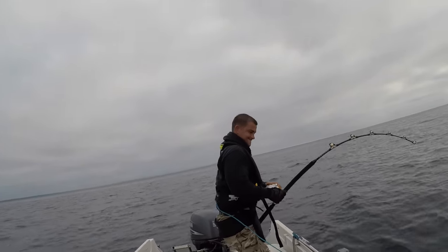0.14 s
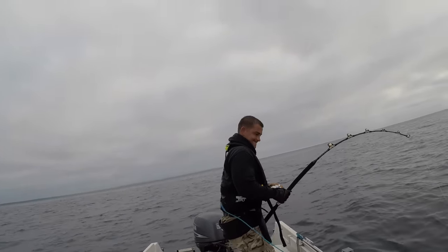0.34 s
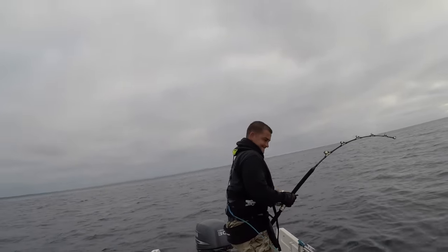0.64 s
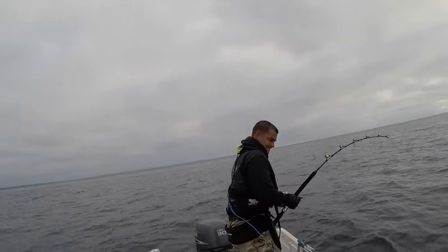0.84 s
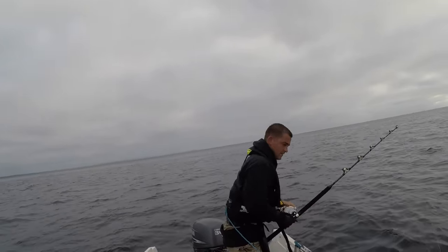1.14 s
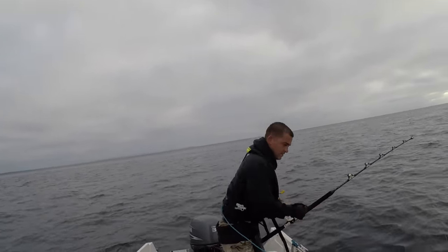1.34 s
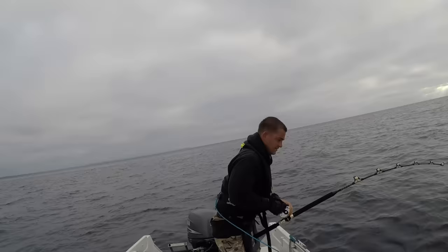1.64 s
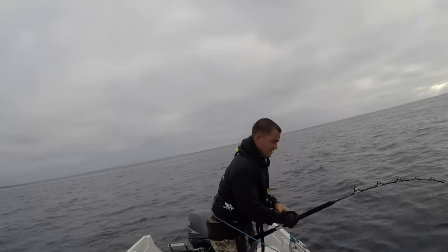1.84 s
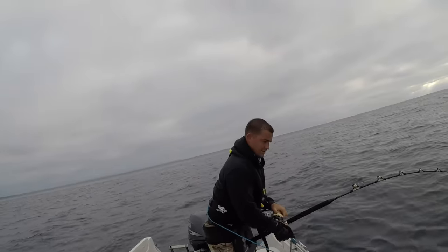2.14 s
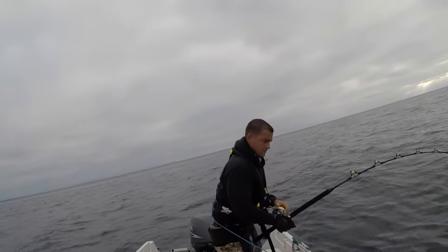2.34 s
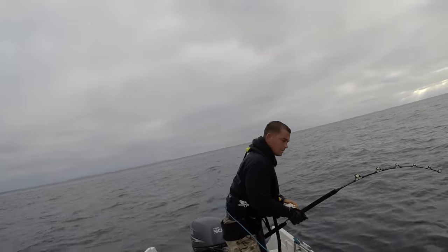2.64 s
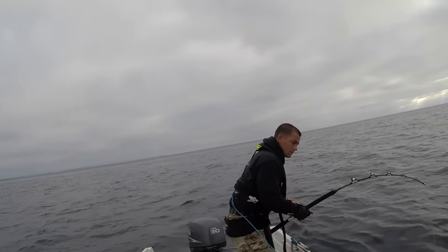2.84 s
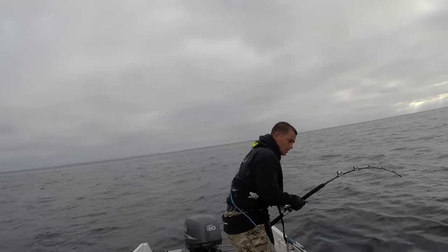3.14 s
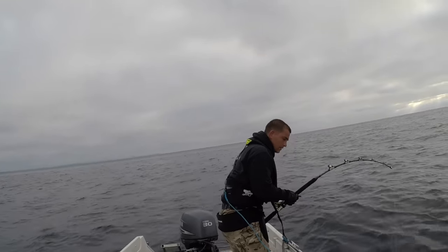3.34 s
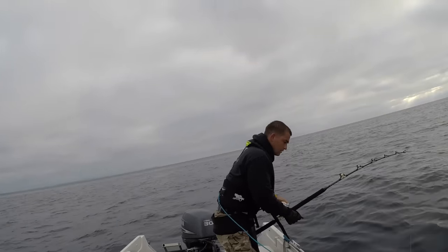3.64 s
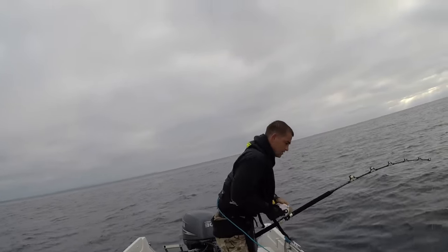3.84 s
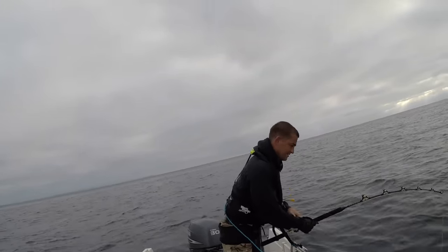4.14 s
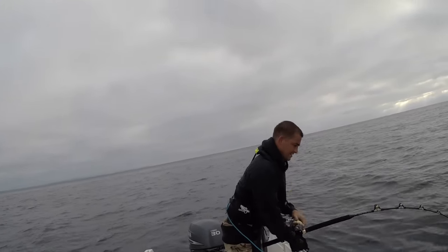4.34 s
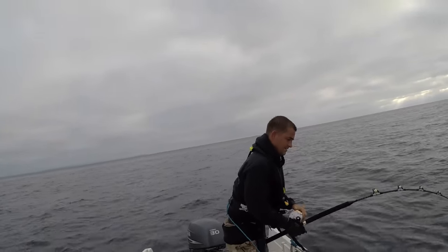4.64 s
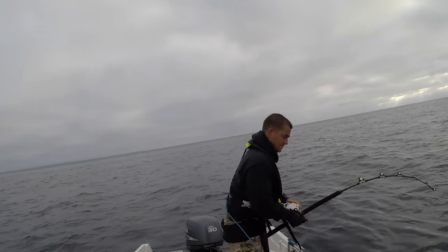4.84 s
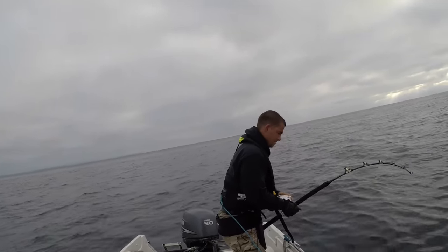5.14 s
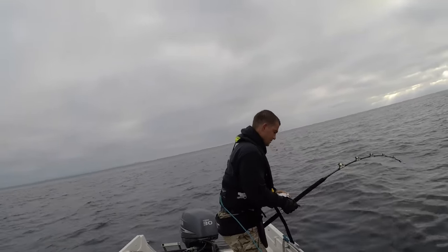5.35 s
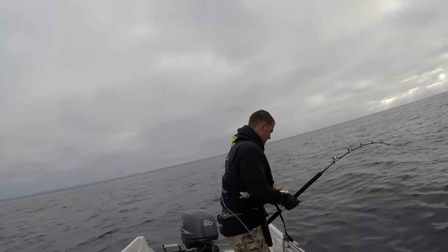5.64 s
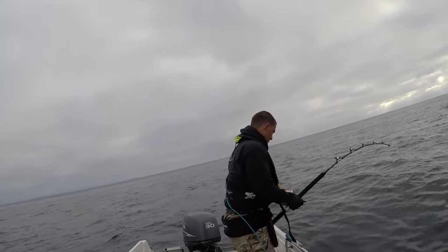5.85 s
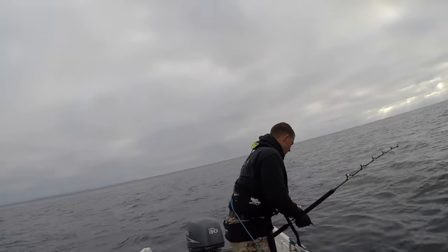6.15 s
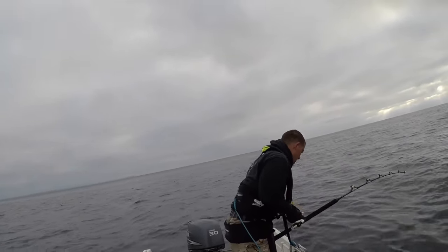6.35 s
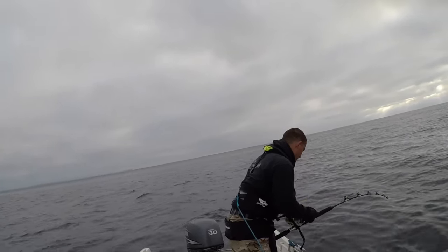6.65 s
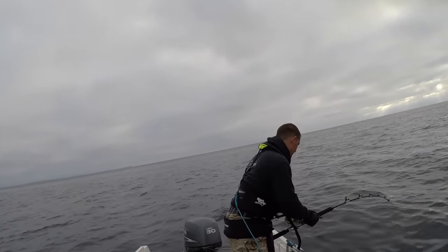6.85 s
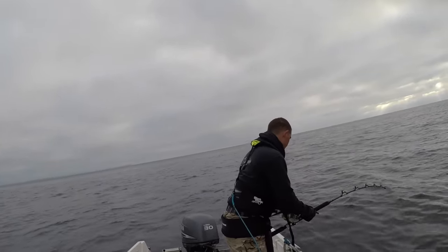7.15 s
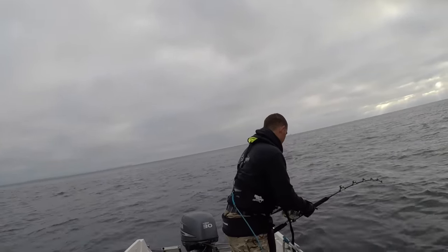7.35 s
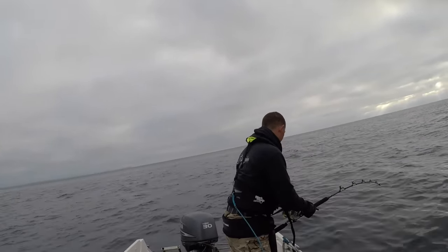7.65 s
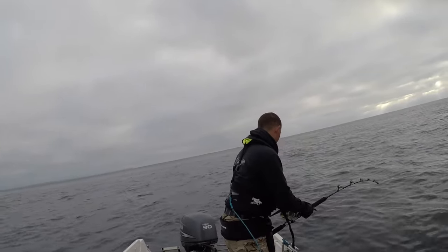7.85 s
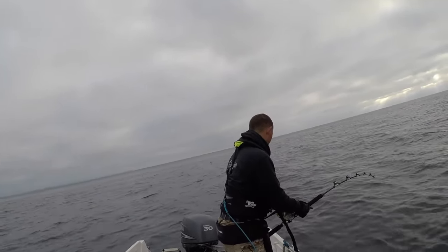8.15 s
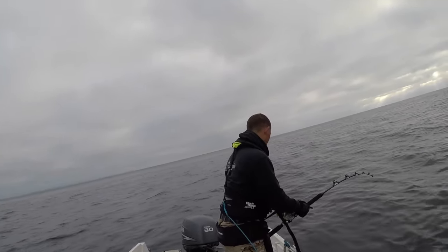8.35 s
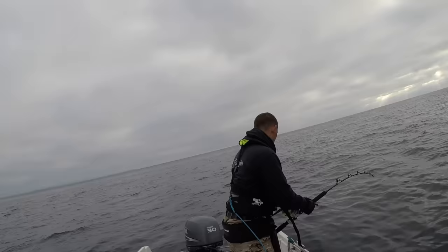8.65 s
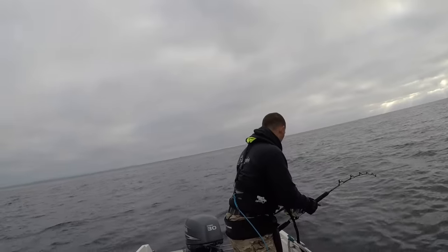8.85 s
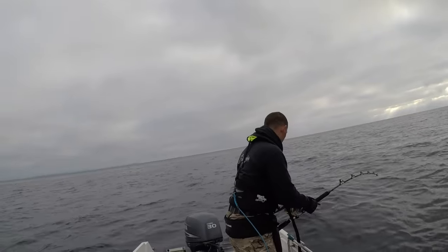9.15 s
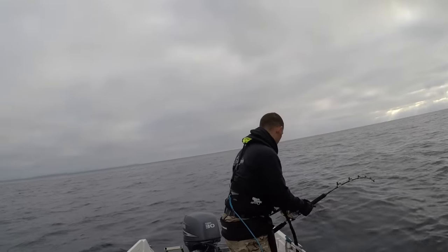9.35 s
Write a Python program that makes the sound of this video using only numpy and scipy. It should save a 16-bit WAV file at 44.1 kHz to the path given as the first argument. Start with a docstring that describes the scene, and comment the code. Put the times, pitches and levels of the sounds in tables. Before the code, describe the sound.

Loud, bright reel clicking races and slows in three main bursts, with low wind buffeting, motor putter and soft sea wash

```python
"""Wind buffets the microphone over an idling outboard: an angler plays a fish from a small boat at sea.
Line leaves the reel in bursts, ticking tooth by tooth and buzzing as the spool races; each tooth's
two pawl landings are shaped noise ringing steel, frame, spool and rod.
Tackle ticks, hull bumps and water slaps are bursts of noise through resonances; the motor is a stack of
wavering harmonics with whirr and valves; wind, sea wash and rustling jacket are shaped noise."""
import sys
import numpy as np
from scipy import signal
from scipy.fft import rfft, irfft
from scipy.io import wavfile
from scipy.ndimage import uniform_filter1d

SR = 44100
rng = np.random.default_rng(int(sys.argv[2]) if len(sys.argv) > 2 else 0)


def wav_out(sig):
    """Save sig, one row per channel (or a flat mono array), as 16-bit PCM at SR to the path in sys.argv[1]."""
    wavfile.write(sys.argv[1], SR, np.round(np.clip(np.atleast_2d(sig).T, -1, 1) * 32767).astype(np.int16))


N = 419371
TIME = np.arange(N) / SR
BODY_BINS_HZ = np.fft.rfftfreq(4096, 1 / SR)

# Tugs of the fish on the line, one list per tug.
# Each row: time in seconds, spool speed in teeth per second, pull on the pawl in dB.
TUGS = [
    [(1.0864, 52.3, 6.5), (1.115, 115, 2.5), (1.14, 149.2, 1.5), (1.2, 156.7, -0.5), (1.24, 153.7, 0.7),
     (1.3, 138.7, 0), (1.345, 124.3, -0.8), (1.385, 86.8, -3.5), (1.42, 98.8, -3), (1.455, 126.2, -3),
     (1.5, 114.8, 0.3), (1.545, 97.2, 1.7), (1.578, 64.3, -1), (1.61, 125.4, 0.3), (1.68, 108.4, 1.2),
     (1.735, 87.3, -0.8), (1.768, 38.6, -1), (1.815, 21.8, 4)],
    [(1.8446, 43.9, -3.5), (1.88, 108.7, -0.5), (1.912, 110.9, 1.5), (1.94, 65.7, 1.1), (1.965, 21.4, -10),
     (1.998, 67.9, -13)],
    [(2.036, 45.7, -14.5), (2.07, 40.5, 8.4), (2.104, 57.8, 3.0), (2.14, 54.4, 0.5)],
    [(3.6516, 51.0, -20.6), (3.674, 51.1, -3)],
    [(3.7098, 62.9, 4), (3.745, 154.6, 1.5), (3.78, 126.5, 2.4), (3.81, 109.9, 1.8), (3.865, 113.2, 3),
     (3.9, 130.3, 1.3), (3.935, 148.7, -0.1), (3.968, 107.6, 0), (3.99, 41, -2.7), (4.01, 28.4, 0.6)],
    [(4.0429, 34.1, 1.2), (4.09, 34.1, -1.5), (4.137, 83.4, -1.2), (4.217, 77.0, 1.0), (4.358, 104.3, 2.1),
     (4.396, 30.5, 2.2)],
    [(6.2037, 26.6, 7.9), (6.22, 46.7, 3), (6.245, 84.9, 3), (6.275, 112.7, 4.3), (6.325, 132.2, 2.3),
     (6.36, 104.3, -0.3), (6.385, 73, -2), (6.412, 38.3, -2.5)],
    [(6.431, 45.8, 0.1), (6.47, 45.9, 1.1), (6.516, 66.0, -1.2), (6.573, 29.7, 6.3)],
    [(6.6037, 31.7, 5.6), (6.64, 53.0, 3.2), (6.699, 69.1, 1.4), (6.765, 19.8, 12.1)],
    [(7.3289, 40, 3.5), (7.34, 40, 3.5)],
]
# How the pawl seats in each tug. Each row: shift of its main note in Hz, shift of its upper resonances
# in Hz, change of its highest resonance in dB, whine of the spool in dB against the rod.
PAWL_SEATING = [(0, -190, 1, -17), (0, -5, 1, -24), (80, 0, -2, -19), (0, -5, -1, -22), (30, -100, 0, -23),
                (0, 193, 4, -10), (170, 77, -2, -11.5), (150, 0, 1, -17), (0, 3, 2, -7), (0, -200, -8, -22)]
# How the pawl lands. Each row: spool speed in teeth per second, contact in seconds, chatter in dB,
# rebound delay in seconds (before scatter), rebound in dB (before the extra rebound and scatter).
PAWL_LANDING = [(60, .0022, -5, .0056, -8), (85, .0018, -4.5, .0053, -4), (115, .0014, -5.5, .0043, -2.5),
                (132, .0015, -4.5, .0038, -2.5), (150, .0015, -4, .0028, -5)]
# How strikes shake the tackle as the load shifts. Each row: time in seconds, frame in dB, change of the
# frame's sharpest ring in dB, rod in dB, grip in dB, extra rebound of the pawl in dB.
LOAD_SHAKE = [(1.1, -10, -4, -13, -19, 7), (1.22, -10.5, -4, -13.5, -21, -6),
              (1.35, -14, 1, -16.5, -21.5, 3.5), (1.5, -10.5, 5, -10.5, -22.5, -0.5),
              (1.68, -10.5, -10, -17, -22, 7), (1.9, -9, 2, -11.5, -22.5, 0), (2.1, -12.5, -3, -15, -26, 2),
              (3.73, -7, 3, -11, -18, 6.5), (3.8, -11, -1, -12, -20, 0), (3.96, -10, -3, -14.5, -21, 8),
              (4.15, -6, 4, -9.5, -19.5, 0.5), (4.35, -12, 2, -14.5, -19, -1),
              (6.25, -8.5, 2, -11.5, -20, 6.5), (6.35, -10.5, 5.5, -14, -21, 4.5),
              (6.5, -5.5, 3.5, -14, -19, 1.5), (6.7, -6.5, 1, -17.5, -19.5, 0.5),
              (7.33, -14, -4, -14.5, -22, -1)]
# Upper resonances of the steel pawl, before seating and scatter.
# Each row: centre in Hz, width in Hz, level in dB against the main note.
PAWL_UPPER_MODES = [(7590, 210, -10), (9900, 1700, -14.5), (10890, 600, -7), (13820, 380, -13)]
# The reel's frame, before load and scatter. Each row: centre in Hz, width in Hz, relative level in dB.
FRAME_MODES = [(3240, 590, -7.5), (3800, 310, 1), (4100, 90, -11), (4770, 410, 1.5), (5420, 550, -1),
               (5920, 590, -0.5), (6750, 320, -2.5)]
# The rod. Each row: centre in Hz, width in Hz, relative level in dB.
ROD_MODES = [(858, 40, -0.5), (940, 38, 2.5), (1020, 40, -3.5), (1115, 30, -4), (1410, 200, -8.5),
             (1880, 400, -11.5)]
# The rod's deeper grip. Each row: centre in Hz, width in Hz, relative level in dB.
GRIP_MODES = [(410, 95, -6.5), (557, 25, -1), (614, 23.5, 2.5), (723, 24.5, -2)]
# Thin note of the spool's flange. Each row: centre in Hz, width in Hz, relative level in dB.
FLANGE_MODES = [(2187, 53, -6)]
# Main note of the pawl: it sags within a tug and scatters (as a fraction), less on a fast spool.
PAWL_HZ, SAG_HZ_PER_S, NOTE_SCATTER = 8334, 260, 0.032
# A tooth strikes hard on a running spool; below the creeping speed it eases the pawl down.
TOOTH_DB, CREEP_TEETH_PER_S, CREEP_DB_PER_OCTAVE = 11, 64.3, 11.5

# The rod butt snaps in its holder. Each row: start in seconds, peak level in dB.
BUTT_SNAPS = [(0.243, -3.5)]
# The butt in its holder. Each row: centre in Hz, width in Hz, relative level in dB.
BUTT_MODES = [(1190, 740, -17.5), (4160, 590, -3), (5040, 650, -5.5), (6740, 550, -1), (7800, 450, 2),
              (10500, 1300, -12), (13400, 1300, -14)]
# Sharper ticks of tackle; the row at 1.052 s is instead a dull knock ringing on just after the first hull bump.
# Each row: start in seconds, peak level in dB, centre in Hz.
TACKLE_TICKS = [(0.614, -27, 7300), (1.052, -20, 1100), (1.809, -21.5, 5000), (2.554, -31, 4550),
                (2.848, -28, 9000), (2.969, -23.5, 6200), (3.066, -24, 7360), (3.157, -30, 3900),
                (4.568, -26, 4240), (4.886, -26, 4750), (4.934, -29, 3440), (5.515, -31, 4350),
                (5.582, -32, 9000), (5.995, -34, 7100), (6.875, -36, 4620), (7.712, -32, 7150),
                (7.734, -27.5, 6978), (7.845, -26, 3800), (8.169, -32, 4370), (8.353, -27.5, 3840),
                (8.656, -30, 7240), (8.748, -31, 6800), (8.872, -37, 7000)]
# Fainter ticks fall at random: loudest peak, spread below it, range of centres.
STRAY_TICK_DB, STRAY_SPREAD_DB, STRAY_LOW_HZ, STRAY_HIGH_HZ = -31, 6, 3800, 9000

# Hollow bumps on the hull. Each row: start in seconds, peak level in dB.
HULL_BUMPS = [(1.049, -9.5), (1.793, -20), (3.568, -14), (7.832, -20.5)]
# The hull. Each row: centre in Hz, width in Hz, relative level in dB.
HULL_MODES = [(149.7, 25.4, 3.5), (330, 100, -14), (955, 590, -29.5)]
# Water slaps on the hull. Each row: start in seconds, peak level in dB, centre in Hz, width in Hz.
WATER_SLAPS = [(4.326, -22, 610, 50), (4.568, -27, 1520, 90), (7.189, -27.5, 770, 110),
               (7.86, -30, 860, 220), (8.41, -37, 1040, 130), (8.789, -30, 820, 110),
               (8.951, -30.5, 1260, 130), (9.045, -30.5, 657, 50), (9.16, -33, 694, 90)]
# A slap's push fades over a fixed number of cycles; softer laps fall at random.
BUMP_DECAY_S, SLAP_CYCLES = 0.02, 18
LAP_DB, LAP_SPREAD_DB, LAP_LOW_HZ, LAP_HIGH_HZ = -37, 5, 550, 1600

# Idling outboard, its pace. Each row: time in seconds, firings per second.
IDLE_PACE = [(0, 21.83), (2.2, 21.82), (2.7, 21.69), (4.4, 21.68), (5.2, 21.47), (6.9, 21.42), (7.6, 21.66),
             (9.51, 21.74)]
# Level of its exhaust thud. Each row: time in seconds, level in dB.
IDLE_LEVEL = [(0, -24.5), (1.5, -33), (2.9, -22.5), (4.1, -28), (7, -26.5), (8.1, -30.5), (8.75, -24),
              (9.5, -28)]
# Its exhaust note. Each row: multiple of the firing rate, relative level in dB.
EXHAUST_ORDERS = [(2, 4), (3, 4), (4, -1), (5, -2), (6, 1), (7, -2.5), (8, 2), (9, -3.5), (11, -14.5),
                  (12, -14.5), (13, -14), (16, -26.5), (17, -21.5), (18, -23.5)]
# The cowling. Each row: centre in Hz, width in Hz, relative level in dB.
COWL_MODES = [(648, 27, 7), (727, 25, 7), (985, 16, 7), (1187, 26, 5), (1641, 30, 6), (2567, 15, 1),
              (3250, 54, 3), (3483, 55, 4), (3840, 200, -2), (4400, 100, -1.5), (4670, 76, -3)]

# Slow buffeting at the microphone. Each row: frequency in Hz, relative density in dB per Hz.
BUFFET_SPECTRUM = [(1, -7), (5, 2.5), (12, 1), (20, -3), (28, -10.5), (45, -35), (90, -78.5)]
# Gusts at the microphone. Each row: frequency in Hz, relative density in dB per Hz.
GUST_SPECTRUM = [(12, -5.5), (26, -1.5), (40, 0), (60, -14.5), (90, -21.5), (150, -33), (400, -44),
                 (1500, -104)]
# When the gusts strike. Each row: start in seconds, length in seconds, level in dB before the gust lift.
GUSTS = [(0.297, 0.4, -17.5), (0.87, 0.52, -16.5), (2.694, 0.043, -18.5), (3.997, 0.4, -20),
         (4.496, 0.059, -22), (4.721, 0.29, -17), (5.33, 0.047, -16.5), (6.956, 0.4, -20),
         (8.342, 0.034, -13)]
# Between them the breeze (also before the lift) and the slow buffeting go on.
BREEZE_DB, BUFFET_DB, GUST_RISE_S, GUST_FALL_S = -25.5, -9.5, 0.0096, 0.013

# Sea wash with the whirr of the outboard. Each row: frequency in Hz, relative density in dB per Hz.
WASH_SPECTRUM = [(60, 3), (170, 5), (270, 1), (380, -7.5), (520, -8), (750, -12.5), (1200, -13.5),
                 (2000, -19), (2700, -22.5), (4500, -27.5), (5600, -35), (8000, -54), (12000, -75),
                 (15000, -68)]
# Rustle of jacket and line. Each row: frequency in Hz, relative density in dB per Hz.
RUSTLE_SPECTRUM = [(2000, 8), (5500, -0.5), (6700, 3.5), (8200, 2), (9500, -3.5), (11000, -2), (13000, -6),
                   (15000, -55)]
# The angler shifts and the jacket rustles. Each row: start in seconds, length in seconds, level in dB.
RUSTLES = [(0.92, 0.082, -44), (2.8, 0.31, -48.5), (3.56, 0.16, -48.5), (4.55, 0.43, -51.5),
           (8.7, 0.45, -56)]
# Between them it flutters faintly.
FLUTTER_DB, RUSTLE_RISE_S, RUSTLE_FALL_S = -52.5, 0.04, 0.13

EDGE_HZ = 15350  # upper limit of the recorded band


def reel(note_width_hz=350, vary_db=2.0, frame_vary_db=3.0, push=0.4, rebound_note=0.99):
    """Each tooth flicks the steel pawl, which lands twice, rings and shakes the frame, spool and rod."""
    t = np.arange(2048) / SR
    metal, spool, rod, grip = np.zeros((4, N))
    scrapes = rng.standard_normal((2, len(t)))  # one for each landing
    alike, note_jitter = .9, .016
    share = np.clip(push, 0, 1)
    load_s, *load_columns = np.transpose(LOAD_SHAKE)
    for tug, (note_shift_hz, shift_hz, top_db, whine_db) in zip(TUGS, PAWL_SEATING):
        upper = np.array(PAWL_UPPER_MODES, float)
        upper[:, 0] += shift_hz
        upper[-1, 2] += top_db
        for s, strength_db, hz, per_s in tug_teeth(tug):
            load = [np.interp(s, load_s, column) for column in load_columns]
            frame_db, ring_db, rod_db, grip_db, rebound_db = load
            shell = np.array(FRAME_MODES, float)
            shell[1, 2] += ring_db
            frame = body(scattered(shell, frame_vary_db))
            # each tooth scrapes much like the one before, so the colour drifts as the spool turns
            fresh = rng.standard_normal(scrapes.shape)
            scrapes = alike * scrapes + np.sqrt(1 - alike ** 2) * fresh
            envelope, landings = flick(t, per_s, rebound_db)
            for (delay_s, force), scrape, note in zip(landings, scrapes, (1, rebound_note)):
                landing_s = s + delay_s
                strike = force * gain_of(strength_db)
                note_hz = (hz + note_shift_hz) * note * (1 + note_jitter * rng.standard_normal())
                pawl = body([(note_hz, note_width_hz, 0)] + scattered(upper, vary_db))
                for response, share_db in ((pawl, 0), (frame, frame_db)):
                    ring = signal.fftconvolve(scrape * envelope, response[:len(t)])
                    add(metal, landing_s, strike * gain_of(share_db) * ring / np.linalg.norm(ring))
                # the rod feels one clean push from each landing, and some of the chatter
                chatter = rng.standard_normal(len(t)) * envelope
                knock = strike * (share * (t == 0) + np.sqrt(1 - share ** 2) * chatter)
                for part, part_db in ((rod, rod_db), (grip, grip_db), (spool, rod_db + whine_db)):
                    add(part, landing_s, knock * gain_of(part_db))
    return metal + through(rod, ROD_MODES) + through(grip, GRIP_MODES) + through(spool, FLANGE_MODES)


def tug_teeth(tug):
    """One strike for each tooth passing the pawl: rows (s, strength dB, pawl Hz, teeth per second)."""
    jitter_s, uneven_db = .0002, 1.3
    t = np.arange(tug[0][0], tug[-1][0], 1 / SR)
    teeth_passed = np.cumsum(curve(tug, t)) / SR
    tooth = np.arange(int(teeth_passed[-1]) + 1)
    late, force, note = rng.standard_normal((256, 3))[tooth].T
    s = np.interp(tooth, teeth_passed, t)
    per_s = curve(tug, s)
    eased_db = CREEP_DB_PER_OCTAVE * np.maximum(np.log2(CREEP_TEETH_PER_S / per_s), 0)
    db = TOOTH_DB + curve(tug, s, axis=2) - eased_db + uneven_db * force
    sagged_hz = PAWL_HZ - SAG_HZ_PER_S * (s - s[0])
    hz = sagged_hz * (1 + NOTE_SCATTER * note * np.minimum(CREEP_TEETH_PER_S / per_s, 1))
    return np.transpose([s + jitter_s * late, db, hz, per_s])


def flick(t, per_s, extra_db):
    """Landing envelope, and a tooth's two landings as (delay s, force), both set by the spool's speed."""
    speeds, *columns = np.transpose(PAWL_LANDING)
    contact_s, chatter_db, rebound_s, rebound_db = (np.interp(per_s, speeds, c) for c in columns)
    envelope = blow(t, contact_s, chatter_db, chatter_s=.0048, deck_db=-18.5, deck_s=.02)
    again = gain_of(rebound_db + extra_db + 2 * rng.standard_normal())
    delay_s = rebound_s * rng.uniform(.92, 1.08)
    total = np.hypot(1, again)  # the two landings share one energy
    return envelope, [(0, 1 / total), (delay_s, again / total)]


def scattered(modes, spread_db):
    """Resonances with their levels scattered at random."""
    return [(hz, width, db + spread_db * rng.standard_normal()) for hz, width, db in modes]


def tackle():
    """Short noisy contacts ring the rod butt as a snap and small tackle as dry ticks."""
    t, out, tick_width = np.arange(4096) / SR, np.zeros(N), .28  # width as a fraction of the centre
    shape = blow(t, contact_s=.0018, chatter_db=-7, chatter_s=.004, deck_db=-24, deck_s=.022)
    faint = strays(STRAY_TICK_DB, STRAY_SPREAD_DB, STRAY_LOW_HZ, STRAY_HIGH_HZ, count=50)
    hits = [(s, db, BUTT_MODES) for s, db in BUTT_SNAPS]
    hits += [(s, db, [(hz, hz * tick_width, 0)]) for s, db, hz in TACKLE_TICKS + faint]
    for s, db, modes in hits:
        tick = signal.fftconvolve(shape * rng.standard_normal(len(t)), body(modes))
        add(out, s, gain_of(db) * tick / abs(tick).max())
    return out


def hull(lap_width=0.044):
    """Boots bump the hollow hull; short pushes of water ring pockets along its side."""
    t, out = np.arange(SR // 4) / SR, np.zeros(N)
    laps = strays(LAP_DB, LAP_SPREAD_DB, LAP_LOW_HZ, LAP_HIGH_HZ, count=12)
    water = WATER_SLAPS + [(s, db, hz, hz * lap_width) for s, db, hz in laps]
    pushes = [(s, db, BUMP_DECAY_S, HULL_MODES) for s, db in HULL_BUMPS]
    pushes += [(s, db, SLAP_CYCLES / hz, [(hz, width_hz, 0)]) for s, db, hz, width_hz in water]
    for s, db, decay_s, modes in pushes:
        burst = np.exp(-t / decay_s) * rng.standard_normal(len(t))
        slap = signal.fftconvolve(burst, body(modes))
        add(out, s, gain_of(db) * slap / abs(slap).max())
    return out


def outboard(lag_s_per_hz=.0003, waver=0.41, valve_hz=4650):
    """Firings thud through the exhaust, higher notes arriving later; cowling and valves sound in step."""
    firing_hz = curve(IDLE_PACE)
    firings, thud = np.cumsum(firing_hz) / SR, np.zeros(N)
    for order, db in EXHAUST_ORDERS:
        multiple = round(order)
        lag_cycles = lag_s_per_hz * (multiple * firing_hz.mean()) ** 2 / 2
        note = np.cos(2 * np.pi * (multiple * firings - lag_cycles))
        thud += gain_of(db) * (1 + waver * drift(9)) * note
    pulse = 1 + 0.39 * np.cos(2 * np.pi * firings)
    whirr = through(rng.standard_normal(N), COWL_MODES) * pulse
    # each tap starts with a firing and fades over a fraction of its cycle
    taps = rng.standard_normal(N) * np.exp(-(firings % 1) / .12) * gain_of(3 * drift(21))
    valves = evened(through(taps, [(valve_hz, 380, 0)]))
    return gain_of(curve(IDLE_LEVEL)) * evened(thud) + gain_of(-51.0) * whirr + gain_of(-60) * valves


def wind(gust_db=4.0):
    """Slow pressure swings and quicker gusts at the microphone, their crests rounded off."""
    buffet = steadied(noise(BUFFET_SPECTRUM)) * gain_of(BUFFET_DB)
    gust_gain = gain_of(gust_db) * swells(GUSTS, BREEZE_DB, GUST_RISE_S, GUST_FALL_S)
    gusts = steadied(noise(GUST_SPECTRUM)) * gust_gain
    fade_in = np.minimum(TIME / .02, 1)
    return .72 * np.tanh(fade_in * (buffet + gusts) / .72)


def steadied(x):
    """Evens out the strength of a noise over a sliding 6000 samples."""
    return x / np.sqrt(abs(uniform_filter1d(x ** 2, size=6000)) + .1)


def sea(drops_per_s=45, drops_db=-57):
    """A soft noise wash, with droplets and bubbles along the hull as decaying sines at random moments."""
    t, drops = np.arange(1024) / SR, np.zeros(N)
    pitches_hz = np.geomspace(700, 9000, num=24)
    for hz in pitches_hz:
        size = gain_of(4.5 * np.minimum(rng.exponential(1, N), 3))
        bursts = size * (rng.random(N) < drops_per_s / len(pitches_hz) / SR)
        ping = np.sin(2 * np.pi * hz * t) * np.exp(-hz * t / 7)
        drops += signal.oaconvolve(bursts, ping)[:N]
    swell_db = .8 * drift(6)
    return noise(WASH_SPECTRUM) * gain_of(-37.5 + swell_db) + gain_of(drops_db) * evened(drops)


def clothes():
    """Jacket and line rustle in fine grains: noise whose level wanders quickly."""
    grain_db = 2 * drift(400) + 1.2 * drift(40)
    shifting = swells(RUSTLES, FLUTTER_DB, RUSTLE_RISE_S, RUSTLE_FALL_S)
    return noise(RUSTLE_SPECTRUM) * gain_of(grain_db) * shifting


def body(modes):
    """Causal (minimum-phase) response, of energy one, of a body with the given resonances."""
    power = sum((gain_of(db) / (1 + ((BODY_BINS_HZ - hz) / width) ** 2)) ** 2 for hz, width, db in modes)
    log_gain = np.log(np.r_[power, power[-2:0:-1]] + 1e-10) / 2
    ring = np.fft.ifft(np.exp(np.conj(signal.hilbert(log_gain)))).real
    return ring / np.linalg.norm(ring)


def through(x, modes):
    """Lets a drive ring a body."""
    return signal.oaconvolve(x, body(modes))[:N]


def blow(t, contact_s, chatter_db, chatter_s, deck_db, deck_s):
    """Envelope, of energy one, of a hard contact, its weaker chatter and scatter from the deck."""
    contact = np.exp(-(t / contact_s) ** 2)
    chatter = (gain_of(chatter_db) * np.exp(-t / chatter_s)) ** 2
    deck = (gain_of(deck_db) * np.exp(-t / deck_s)) ** 2
    power = contact + chatter + deck
    return np.sqrt(power / power.sum())


def strays(top_db, spread_db, low_hz, high_hz, count):
    """Small events at random moments: rows (s, peak dB, centre Hz)."""
    return [(when * N / SR, top_db - spread_db * weak, low_hz * (high_hz / low_hz) ** high)
            for when, weak, high in rng.random((count, 3))]


def swells(rows, rest_db, rise_s, fall_s):
    """Gain that rises, holds and falls for each row (s, length s, dB), above a resting level."""
    power = gain_of(rest_db) ** 2
    for s, length_s, db in rows:
        before = np.maximum(s - TIME, 0) / rise_s
        after = np.maximum(TIME - s - length_s, 0) / fall_s
        power = power + gain_of(db) ** 2 * np.exp(-(before + after) ** 2)
    return np.sqrt(power)


def noise(spectrum):
    """Noise of rms one with the given spectrum."""
    hz, db = np.transpose(spectrum)
    bins_hz = np.fft.rfftfreq(N, 1 / SR)
    shape = gain_of(np.interp(np.log(bins_hz + 1), np.log(hz + 1), db))
    return evened(irfft(rfft(rng.standard_normal(N)) * shape, N))


def drift(per_s):
    """A random wander of rms one, with per_s new values a second joined by lines."""
    knots = rng.standard_normal(4096)
    return evened(np.interp(TIME * per_s, np.arange(len(knots)), knots))


def curve(rows, at=TIME, axis=1):
    """One column of a table, joined by straight lines in time."""
    columns = np.transpose(rows)
    return np.interp(at, columns[0], columns[axis])


def add(mix, s, sound):
    """Mixes a sound in at s seconds."""
    part = mix[max(round(s * SR), 0):][:len(sound)]
    part += sound[:len(part)]


def gain_of(db):
    """Decibels to amplitude."""
    return 10 ** (np.asarray(db) / 20)


def evened(x):
    """Scales to an rms of one."""
    return x / np.sqrt(np.mean(x ** 2) + 1e-20)


def scene():
    """Everything on the boat, heard from one point."""
    return (reel() + tackle() + hull() + outboard() + wind() + sea() + clothes())[None]


def record(dry):
    """Peaks beyond full scale are clipped; then a low-pass limits the band."""
    clipped = np.clip(dry, -1, 1)
    low_pass = signal.firwin(255, EDGE_HZ, window=("kaiser", 7), fs=SR)
    return signal.oaconvolve(clipped, low_pass[None], "same")


dry = scene()
out = record(dry)
wav_out(out)
```